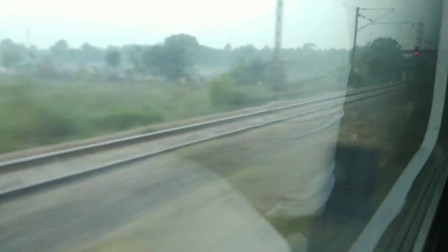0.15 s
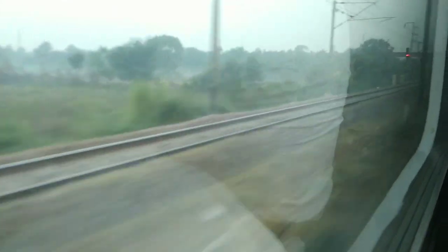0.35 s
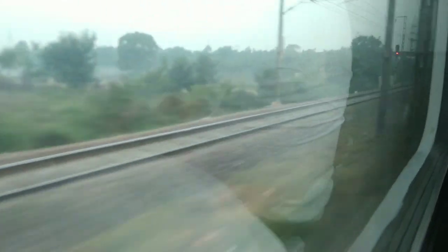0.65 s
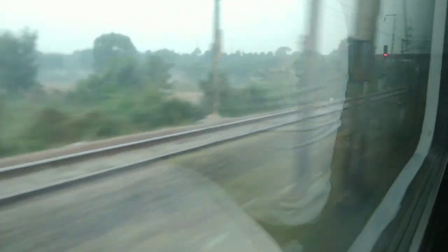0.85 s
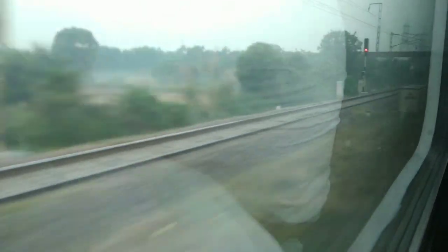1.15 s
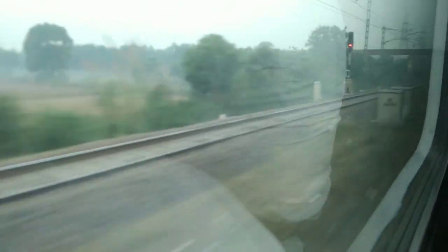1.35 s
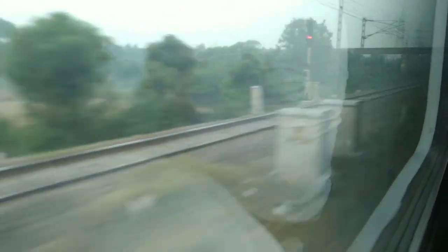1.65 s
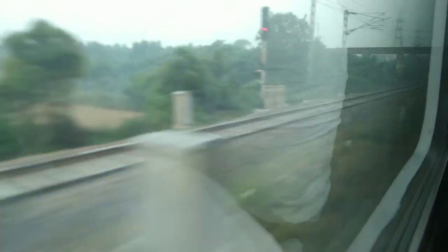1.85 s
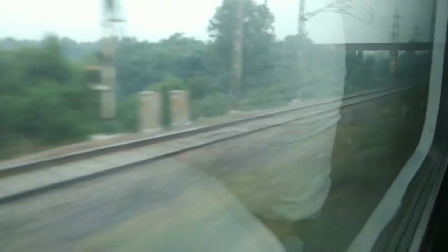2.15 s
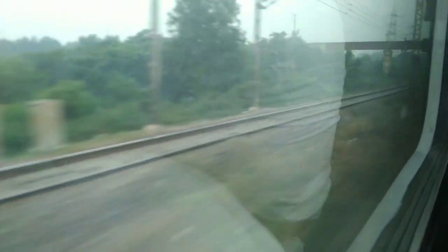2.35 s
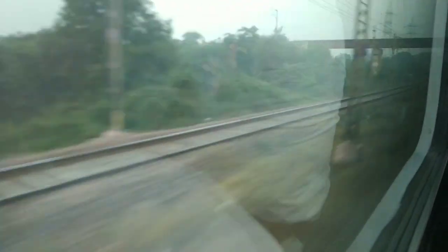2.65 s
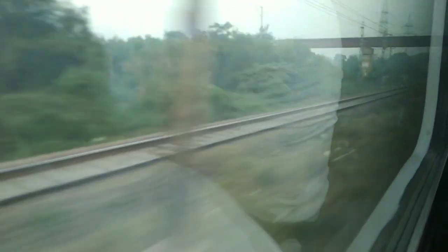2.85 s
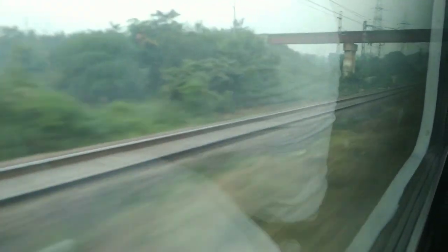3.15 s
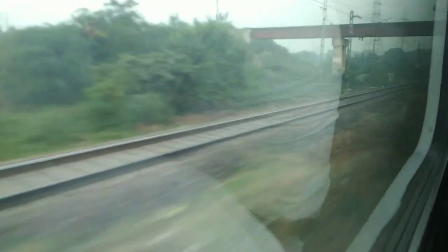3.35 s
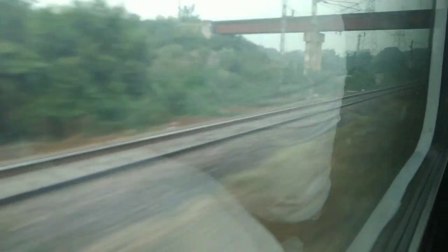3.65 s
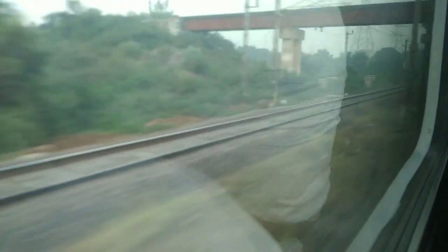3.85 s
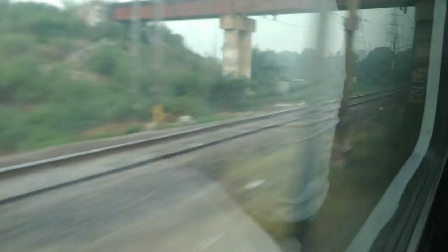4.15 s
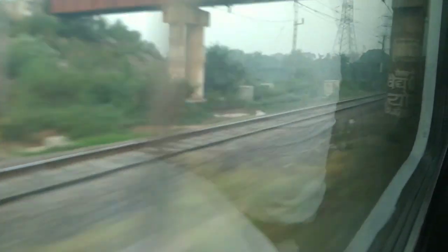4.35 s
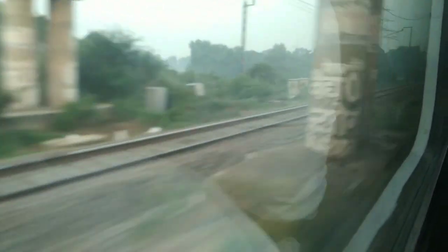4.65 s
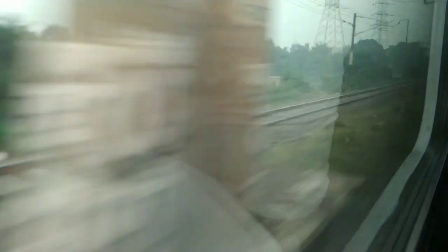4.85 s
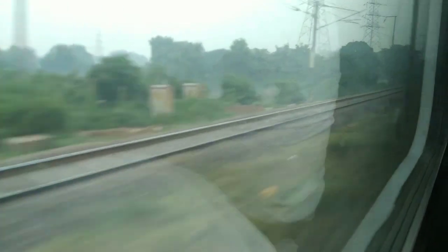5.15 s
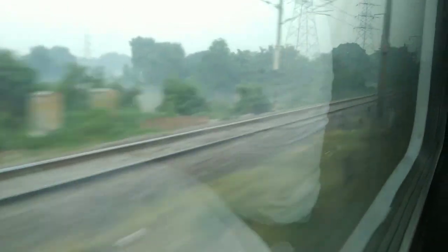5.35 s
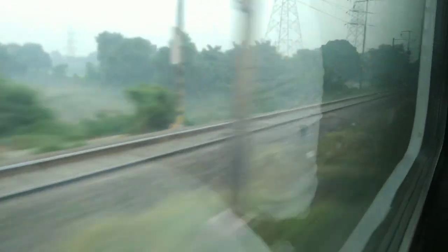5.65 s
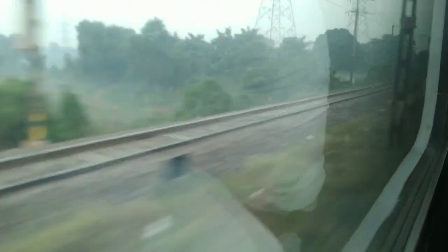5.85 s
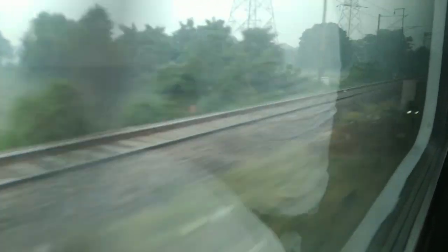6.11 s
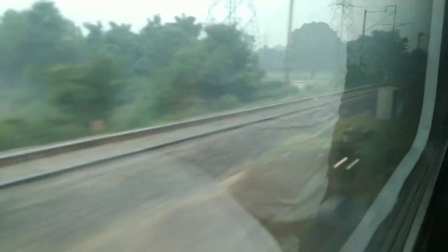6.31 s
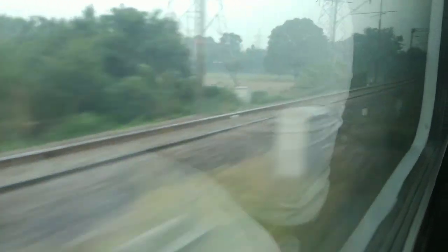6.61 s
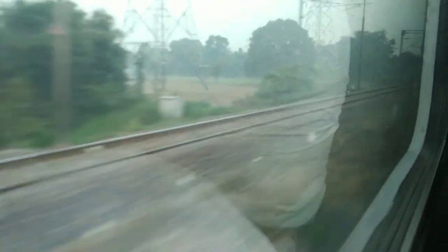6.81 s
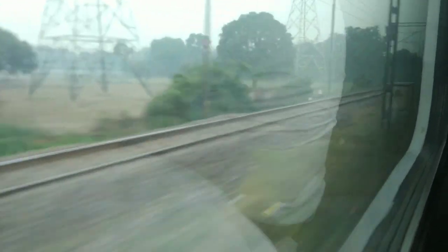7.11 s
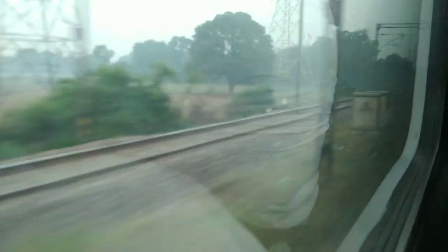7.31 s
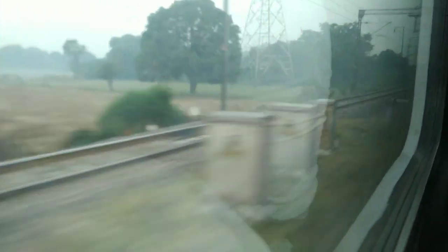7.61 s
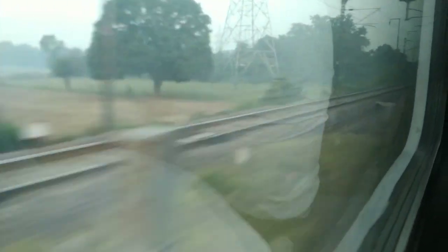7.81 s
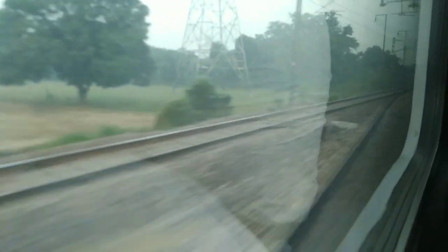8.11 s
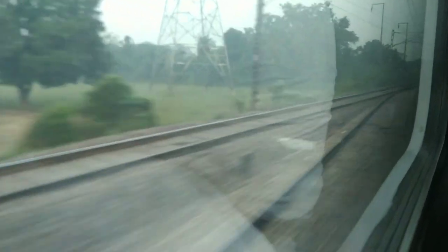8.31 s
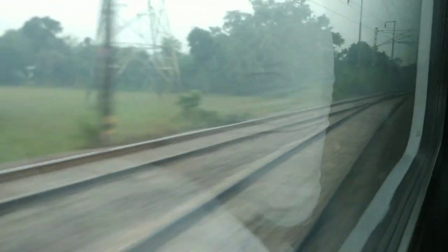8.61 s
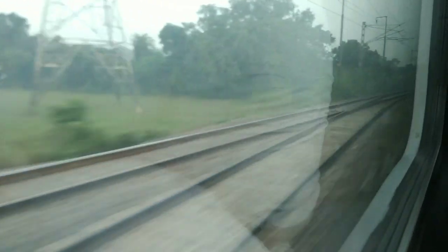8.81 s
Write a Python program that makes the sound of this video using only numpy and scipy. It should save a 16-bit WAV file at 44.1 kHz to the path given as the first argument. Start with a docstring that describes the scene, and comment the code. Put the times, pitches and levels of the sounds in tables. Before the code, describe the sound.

Nine seconds inside a coach running fast, in one channel, close to loose fittings and without bright treble. A deep rumble of floor, bogie and rails runs throughout, swelling in short low booms, under faint wheel singing and thin window air hiss. The first second and a half is fairly even, with weak joint knocks. Around 1.5 s the body heaves and a panel buzzes roughly until 2.9 s, with gritty rattles, a clatter at 2.1 and tiny squeaks near 2.4-2.7. Jolts gather at 3.2-3.4; a sharp close click falls at 4.1, then clatter at 4.4. From 5.2 to 6.5 the buzz returns among stronger knocks, rattles and fainter clicks at 5.9 and 6.3. After clatter at 7.0 and 7.4, the heaviest shaking comes from 7.6 to 8.4, booming hardest near 8.15. It eases somewhat, but the rumble runs to the end.

```python
"""Inside a coach running fast for nine seconds, the microphone among loose fittings, air hissing along the window.
From the start noise rings floor, bogie, rails and wheels; short tones swell in the rumble, rail joints clatter.
About 1.5 s the body heaves once and a panel, tapped 66 times a second, buzzes until 2.9 s; narrow noises squeak.
Damped modes click close by near 4.1, 5.9 and 6.3 s; the buzz is back from 5.2 to 6.5 s, and bursts rattle throughout.
The heaviest shaking comes between 7.6 and 8.4 s, and the ride runs on to the end."""
import sys
import numpy as np
from scipy import signal
from scipy.fft import rfft, irfft
from scipy.io import wavfile
from scipy.ndimage import uniform_filter1d

SR = 44100
rng = np.random.default_rng(int(sys.argv[2]) if len(sys.argv) > 2 else 0)


def put_to_file(sound):
    """Save the sound as 16-bit audio at rate SR, in the file named by the first command-line argument."""
    columns = np.atleast_2d(sound).T  # one column per channel
    safe = np.clip(columns, -1, 1)
    whole_steps = np.round(safe * 32767)
    wavfile.write(sys.argv[1], SR, whole_steps.astype(np.int16))


N = 395567

# rolling noise: (t/s, rail level/dB, wheel ring level/dB)
RUSH = [(0.0, -40, -46), (1.2, -39, -50.5), (2.1, -37, -47.5), (2.27, -39, -51.5), (2.87, -38, -47.5),
        (3.15, -34.5, -48), (3.57, -41.5, -50.5), (4.45, -37.5, -48.5), (4.75, -38.5, -47.5),
        (5.3, -36, -48), (5.6, -35, -45), (5.9, -34, -45), (6.1, -33, -44), (6.47, -37, -49.5),
        (7.44, -38, -50), (7.62, -39, -48), (7.72, -34, -45), (7.82, -36.5, -42), (7.92, -39.5, -49.5),
        (8.05, -37.5, -44), (8.14, -33, -43.5), (8.3, -33, -43.5), (8.54, -37.5, -45.5),
        (8.97, -35.5, -47.5)]
# modes of the bogie, relative levels: (f/Hz, width/Hz, level/dB)
BOGIE = [(152, 29, -1.5), (173, 87, 1.5), (264, 58, -1.5), (317, 47, -3.5), (405, 96, -15)]


def gain_of(db):
    """Amplitude factor of a level in dB."""
    return 10 ** (np.asarray(db) / 20)


def evened(x):
    """Scales a signal to an RMS of one."""
    return x / np.sqrt(np.mean(x ** 2) + 1e-20)


def add(mix, s, sound):
    """Lays a sound into the mix from the given second on."""
    part = mix[max(round(s * SR), 0):][:len(sound)]
    part += sound[:len(part)]


def along(rows):
    """The columns of a curve table, one value per sample."""
    s, *columns = np.transpose(rows)
    return [np.interp(np.arange(N) / SR, s, c) for c in columns]


def shape(points, size, tilt_db=0., pivot_hz=1000):
    """Gain per bin of a spectrum, tilted by dB per octave about a pivot."""
    f, db = np.transpose(points)
    hz = np.fft.rfftfreq(size, 1 / SR) + 1
    curve_db = np.interp(np.log(hz), np.log(f + 1), db)
    return gain_of(curve_db + tilt_db * np.log2(hz / pivot_hz))


def modal(modes, size=N, order=2):
    """Gain per bin of a set of resonances, their powers summed."""
    hz = np.fft.rfftfreq(size, 1 / SR)
    return np.sqrt(sum(gain_of(2 * db) / (1 + (2 * (hz - f) / w) ** 2) ** order for f, w, db in modes))


def noise(gain, size):
    """Random noise with the given spectrum and an RMS of one."""
    a, b = rng.standard_normal((2, len(gain)))
    return evened(irfft((a + 1j * b) * gain, size))


def ringing(modes, t, turns):
    """Damped sines of struck modes: a wider resonance dies sooner."""
    return sum(gain_of(db) * np.exp(-np.pi * width * t) * np.sin(2 * np.pi * (hz * t + turn))
               for (hz, width, db), turn in zip(modes, turns))


def flutter(seconds, depth_db):
    """Random unevenness of level, changing over about the given time."""
    span = max(int(seconds * SR), 2)
    drift = uniform_filter1d(uniform_filter1d(rng.standard_normal(N), span), span)
    return gain_of(depth_db * evened(drift))


def steadied(x, seconds, share):
    """Takes out part of the slow chance beating of narrow noise."""
    span = int(seconds * SR)
    power = abs(uniform_filter1d(uniform_filter1d(x ** 2, span), span)) + 1e-3
    return evened(x / power ** (np.clip(share, 0, 1) / 2))


def patchy(x, depth_db):
    """Uneven noise: narrow patches of the spectrum rise and sink at random."""
    z = signal.stft(x, nperseg=1024, noverlap=768)[2]
    patches = uniform_filter1d(rng.standard_normal(z.shape), size=3, axis=0)
    patches = evened(uniform_filter1d(patches, size=10, axis=1))
    return evened(signal.istft(z * gain_of(depth_db * patches), nperseg=1024, noverlap=768)[1][:N])


def heaving():
    """Very low noise, felt more than heard, with one slow swing of the body."""
    # spectrum, relative: (f/Hz, level/dB)
    heave_curve = [(1, -2.5), (4, 21.5), (12, 15), (20, 0.5), (30, -61)]
    # the one swing: (t/s, level/dB, f/Hz, length/s)
    s, db, hz, length = (1.525, -12, 9.5, .17)
    heave = gain_of(-27.5) * noise(shape(heave_curve, N), N)
    t = np.arange(round(length * SR)) / SR
    add(heave, s, gain_of(db) * np.sin(np.pi * t / length) * np.sin(2 * np.pi * hz * t))
    return heave


def rolling():
    """Rail roughness drives the slow sway, the floor and bogie modes, and the rail."""
    # how hard the track shakes the coach: (t/s, floor boom level/dB, bogie level/dB, floor bending level/dB)
    ride = [(0.0, -31, -35, -25), (0.82, -27, -35, -32.5), (1.2, -30, -37.5, -31.5),
            (1.9, -27, -33.5, -29.5), (2.95, -29.5, -35, -30), (3.05, -23, -26.5, -32),
            (3.25, -29, -29.5, -21), (3.36, -29.5, -33, -28), (3.55, -26.5, -34, -26.5),
            (4.15, -26.5, -34.5, -27), (4.22, -27, -28, -28), (4.65, -32, -34.5, -26.5),
            (5.3, -24.5, -33, -27.5), (5.84, -22, -28.5, -23.5), (6.54, -26, -30.5, -29.5),
            (6.75, -30.5, -26.5, -22), (6.93, -24.5, -32, -26), (7.05, -26, -26.5, -27.5),
            (7.3, -32, -36.5, -25.5), (7.42, -26, -31.5, -30), (7.55, -25, -27.5, -30),
            (7.64, -20.5, -31, -18), (7.74, -18, -18, -14), (7.86, -20.5, -29, -32),
            (7.95, -30, -29.5, -21.5), (8.05, -33, -28.5, -24), (8.09, -20, -27.5, -29),
            (8.15, -14.5, -13, -16), (8.27, -15.5, -24, -18.5), (8.36, -16, -25, -29),
            (8.55, -24.5, -33, -26.5), (8.97, -26, -32, -23)]
    # spectrum of the sway, relative: (f/Hz, level/dB)
    sway_curve = [(8, -19.5), (18, -5.5), (27, 1.5), (36, -5.5), (45, -17.5), (60, -24), (100, -64.5)]
    # two long bending modes, then three panel modes that boom: (f/Hz, width/Hz, relative level/dB)
    floor_modes = [(59, 14, 1), (65.3, 17, -1), (82.4, 15, -2.5), (102.4, 20, -1), (119, 20, -10.5)]
    # spectrum of the rail, relative: (f/Hz, level/dB)
    rail_curve = [(220, -32.5), (380, -1.5), (418, -0.5), (476, 1.5), (512, -2), (615, 1), (738, -6.5),
                  (886, -8), (1200, -19), (1560, -38.5), (2640, -120)]
    boom_db, bogie_db, bend_db = along(ride)
    lumps = flutter(.06, depth_db=1.7)  # floor, bogie and rail feel the same uneven track

    calm_db, calm_boom_db, follows = -29, -28.5, 0.32  # sway rises by a share of the boom over its calm level
    sway_db = calm_db + follows * (boom_db - calm_boom_db)
    sway = gain_of(sway_db) * noise(shape(sway_curve, N), N) * flutter(0.14, depth_db=3.0)

    bend = gain_of(bend_db) * steadied(noise(modal(floor_modes[:2]), N), 0.11, share=0.89)
    boom = gain_of(boom_db) * steadied(noise(modal(floor_modes[2:]), N), 0.066, share=0.47)
    bogie = gain_of(bogie_db) * steadied(noise(modal(BOGIE), N), 0.062, share=0.45)
    rail = patchy(noise(shape(rail_curve, N), N), depth_db=1.7)
    rail *= gain_of(along(RUSH)[0]) * flutter(0.013, depth_db=0.5)
    return heaving() + sway + lumps * (bend + boom + bogie) + lumps ** .5 * rail


def rumble_swells():
    """Swells of the rumble: short tones of a few cycles that rise and die."""
    # low booming swells: (loudest at t/s, level/dB, f/Hz, length scale/s)
    low_swells = [(0.147, -20, 79, 0.02), (0.234, -12.5, 82, 0.03), (0.549, -18, 77, 0.02),
                  (0.974, -19, 74.6, 0.028), (1.221, -17, 77.5, 0.035), (1.735, -15.5, 70.5, 0.041),
                  (1.932, -11.5, 86, 0.014), (2.08, -15, 83, 0.028), (2.216, -29, 88, 0.0098),
                  (3.105, -24, 93, 0.032), (3.219, -12.5, 87, 0.038), (3.435, -14, 112, 0.036),
                  (4.294, -10, 85, 0.037), (4.423, -11, 96, 0.024), (4.72, -13, 79, 0.014),
                  (4.928, -10.5, 74.5, 0.02), (5.194, -11.5, 90.5, 0.022), (5.559, -11.5, 97.4, 0.054),
                  (5.792, -11.5, 81, 0.031), (5.85, -10, 83.5, 0.024), (5.931, -8.5, 95.6, 0.016),
                  (6.336, -5, 84, 0.017), (6.581, -14, 71, 0.033), (6.736, -16, 113, 0.055),
                  (6.888, -18, 103, 0.016), (7.007, -17, 129, 0.017), (7.097, -11.5, 77, 0.019),
                  (7.593, -7, 76.5, 0.017), (7.713, -13, 96, 0.018), (7.771, -13, 102, 0.024),
                  (7.859, -10, 89, 0.02), (8.079, -7, 116, 0.032), (8.148, -2.5, 107.6, 0.032),
                  (8.217, -9, 104, 0.036), (8.318, -6.5, 95, 0.025), (8.401, -10, 90.5, 0.022),
                  (8.651, -14, 85.4, 0.025), (8.715, -9.5, 69, 0.033), (8.81, -24, 82, 0.017),
                  (8.882, -11, 91, 0.02)]
    # higher, shorter swells, about 150 to 600 Hz: (loudest at t/s, level/dB, f/Hz, length scale/s)
    higher_swells = [(0.353, -20, 172, 0.018), (1.684, -24, 515, 0.0095), (2.017, -27, 457, 0.017),
                     (2.68, -24, 164, 0.033), (3.065, -27, 276, 0.022), (3.105, -30, 170.0, 0.02),
                     (3.211, -24.0, 280, 0.036), (3.416, -22.5, 279.0, 0.026), (4.206, -17, 178, 0.016),
                     (4.293, -24, 172, 0.017), (4.412, -28, 566, 0.014), (4.489, -30, 587, 0.025),
                     (5.346, -24.5, 288, 0.013), (5.555, -20.5, 270, 0.016), (5.557, -27, 474, 0.0091),
                     (5.716, -24, 520, 0.011), (5.992, -22, 590, 0.0094), (6.016, -27, 274, 0.025),
                     (6.317, -26, 282, 0.014), (6.645, -22, 557, 0.0087), (6.711, -22, 284, 0.011),
                     (6.733, -18, 168, 0.027), (7.004, -22.5, 157, 0.042), (7.424, -24.5, 307.0, 0.043),
                     (7.428, -27, 500, 0.01), (7.584, -19, 167, 0.036), (7.654, -14.5, 163, 0.019),
                     (7.705, -22, 304, 0.015), (7.72, -17, 181.0, 0.012), (7.737, -25, 486, 0.023),
                     (7.774, -17.5, 310, 0.022), (7.819, -17.5, 153, 0.04), (8.077, -17, 300, 0.022),
                     (8.113, -11, 169, 0.032), (8.133, -14.5, 269, 0.024), (8.134, -35, 559.0, 0.015),
                     (8.176, -8, 169, 0.02), (8.18, -24, 483, 0.013), (8.185, -16.5, 303, 0.017),
                     (8.231, -31, 524.0, 0.01), (8.246, -15, 270, 0.042), (8.278, -24, 607, 0.018),
                     (8.304, -17.5, 166, 0.049), (8.877, -29, 277, 0.057)]
    tones = low_swells + higher_swells
    out, t = np.zeros(N), np.arange(-3000, 5000) / SR
    for (s, db, hz, length), turn in zip(tones, rng.random(len(tones))):
        rise = np.exp(-(t / (0.34 * length)) ** 2)
        fall = 1 / np.cosh(t / (0.33 * length))
        swell = np.where(t < 0, rise, fall)
        add(out, s + t[0], gain_of(db) * swell * np.sin(2 * np.pi * (hz * t + turn)))
    return out


def jolts():
    """Each rail joint gives a clatter of shaped noise and knocks the bogie modes."""
    # (t/s, clatter level/dB, fading t60/s, brightness/dB per octave, knock level/dB before a common cut)
    joints = [(0.209, -49, 0.29, -3, -25), (0.515, -47, 0.206, -2, -20), (1.723, -38.5, 0.3, -14, -20),
              (1.896, -48, 0.19, 5, -5.5), (2.065, -24, 0.25, -7, -13), (3.2, -33.5, 0.45, 2, -6),
              (3.288, -38.5, 0.3, 3.5, -24), (3.409, -34.5, 0.1, 0, -6), (3.759, -42, 0.37, 2.5, -38),
              (3.839, -32, 0.21, 0.8, -35), (4.029, -32.5, 0.26, -0.5, -24), (4.199, -40, 0.43, 3, -26),
              (4.273, -37.5, 0.99, 1, -16), (4.396, -26, 0.25, -2, -10), (4.479, -28.5, 0.24, -4, -10),
              (4.909, -51, 0.26, -4, -26), (5.179, -28.5, 0.18, -4, -16), (5.54, -25.5, 0.58, -4, 0),
              (5.619, -38, 0.5, 2, -29), (5.707, -32.5, 0.27, 0.7, -34), (5.798, -37.5, 0.23, 2.5, -25),
              (5.985, -27, 0.76, -1.2, -21.5), (6.059, -27.5, 0.23, 0.5, -18),
              (6.26, -27.5, 0.66, -2.5, -23), (6.333, -42.5, 0.19, 6, -1), (6.612, -29, 0.95, -1.5, -30),
              (7.01, -32.5, 0.7, -0.6, -31), (7.403, -27, 0.99, -2.5, -24), (7.625, -30.5, 0.91, -2.5, -26),
              (7.705, -24.5, 0.38, -5.5, -14), (8.065, -24, 0.78, -3, -26), (8.129, -29, 0.59, 0, -15),
              (8.194, -22.5, 0.16, -2.5, -19), (8.267, -28.5, 0.22, -5.5, -30),
              (8.409, -24.5, 0.34, -4.5, -33), (8.655, -32.5, 0.36, -3.5, -15)]
    # spectrum of the clatter, relative: (f/Hz, level/dB)
    clatter_curve = [(150, -26.5), (250, -2), (364, -4), (632, -17), (731, -18.5), (935, -21), (1420, -32),
                     (1960, -25.5), (3210, -37), (6340, -48.5), (8000, -63.5), (10400, -87.5),
                     (17600, -120)]
    out, t = np.zeros(N), np.arange(16384) / SR
    low_cut = shape([(200, -28.5), (600, -8.0)], len(t))
    knock_modes = [(hz, width, db - 7) for hz, width, db in BOGIE]  # the common cut, in dB
    for s, db, t60, tilt_db, knock_db in joints:
        clatter = noise(shape(clatter_curve, len(t), tilt_db) * low_cut, len(t))
        rise = .006 + .05 * t60  # s: a clatter that fades slowly also swells slowly
        swell = np.sin(np.pi / 2 * np.minimum(t / rise, 1)) ** 2
        fade = gain_of(db - 60 * np.maximum(t - rise / 2, 0) / t60)
        add(out, s - rise / 2, swell * fade * clatter)
        knock = ringing(knock_modes, t, rng.random(len(knock_modes)))
        add(out, s, gain_of(knock_db) * np.minimum(t / 0.017, 1) * knock)
    return out


def buzz():
    """Evenly timed taps of random strength, with noise between them, ring the modes of a panel."""
    # two spells of buzzing: (t/s, level/dB)
    spells = [(1.45, -62), (1.54, -36.5), (1.75, -37), (1.83, -42.5), (1.92, -34.5), (2.05, -37),
              (2.36, -36.5), (2.64, -38.5), (2.76, -51), (2.9, -66.5), (5.2, -69.5), (5.45, -48),
              (5.65, -35.5), (5.85, -38), (6.0, -36), (6.2, -39), (6.35, -42.5), (6.5, -66)]
    # modes of the panel: (f/Hz, width/Hz, relative level/dB)
    panel_modes = [(470, 40, -1), (519, 38, 0.5), (560, 40, 0), (596.7, 36, -1), (624.6, 30, -7)]
    taps_per_s = 66
    swell = gain_of(along(spells)[0]) * flutter(0.061, depth_db=3.0)
    tap_count = np.floor(np.cumsum(np.full(N, taps_per_s)) / SR)
    taps = np.diff(tap_count, prepend=0) * gain_of(2.5 * rng.standard_normal(N))
    drive = evened(taps) + 1.4 * rng.standard_normal(N)
    t = np.arange(2000) / SR
    ring = ringing(panel_modes, t, np.zeros(len(panel_modes)))
    soft_ring = ring * (1 - np.exp(-t / 0.0043))  # soft taps: the ring builds up gradually
    panel = evened(signal.oaconvolve(drive, soft_ring)[:N])
    return swell * steadied(panel, 0.05, share=0.6)


def rattles():
    """Loose fittings: a burst of gritty noise that swells and dies, like dense tiny impacts."""
    # (t/s, level/dB, rise/s before a slight stretch, fading t60/s, brightness/dB per octave)
    bursts = [(0.0, -53.5, 0.013, 1.1, 11), (.92, -57, 0.042, 0.34, 14), (1.19, -58, 0.0046, 0.084, 10),
              (1.564, -43.5, 0.023, 0.31, 4.5), (1.586, -38, 0.026, 0.23, 2.5),
              (1.929, -54.5, 0.078, 0.69, 5), (2.035, -49.5, 0.0093, 0.31, 20),
              (2.068, -37, 0.011, 0.25, 2), (2.31, -53, 0.022, 0.83, 15), (2.382, -37, 0.013, 0.19, 7),
              (2.661, -40, 0.013, 0.22, 0.5), (3.188, -53, .02, 0.3, 1), (3.29, -56, 0.035, .5, 4),
              (3.412, -40.5, 0.014, 0.13, 5.5), (3.47, -51, .03, .8, -1), (3.75, -61, .025, .25, -3),
              (5.628, -55, .01, .15, -3), (5.715, -45, 0.018, 0.23, -5), (5.859, -41, 0.0036, 0.14, -1.5),
              (5.985, -48, .025, 0.3, -4), (6.06, -52, 0.015, .5, -4), (6.78, -55, 0.037, .5, -4),
              (6.99, -47, 0.065, .5, -5), (7.1, -55, .02, .5, 0), (7.399, -52, .008, 0.25, -5),
              (7.69, -50.5, .04, .6, 2), (8.071, -48, .06, 0.96, -5.5), (8.1, -57, .08, 1.44, 0.5),
              (8.64, -58, 0.026, 0.205, 16), (8.89, -45, .004, 0.25, 8)]
    # spectrum of the fittings, relative: (f/Hz, level/dB)
    fitting_curve = [(710, -34.5), (1200, -6), (1580, -1), (1730, -5.5), (2080, -8), (3130, -9),
                     (4120, -11.5), (6690, -19), (7370, -19), (8250, -32.5), (10700, -57.5), (18200, -120)]
    out, t = np.zeros(N), np.arange(22050) / SR
    for s, db, rise, t60, tilt_db in bursts:
        unevenness = uniform_filter1d(rng.standard_normal(len(t)), size=130)
        grit = evened(gain_of(1.3 * evened(unevenness)))
        swell = np.sin(np.pi / 2 * np.minimum(t / (1.1 * rise), 1)) ** 2
        fade = gain_of(db - 60 * np.maximum(t - rise, 0) / t60)
        rattle = noise(shape(fitting_curve, len(t), tilt_db, pivot_hz=4000), len(t))
        add(out, s, swell * fade * grit * rattle)
    return out


def squeaks():
    """Short rings and squeaks: narrow noise under half a sine of level."""
    # (t/s, level/dB, f/Hz, width/Hz, length/s)
    squeak_rows = [(1.967, -64, 6190, 400, 0.089), (2.394, -53, 7450, 300, 0.044),
                   (2.5, -64, 5200, 400, 0.015), (2.518, -56, 5250, 500, 0.019),
                   (2.547, -64, 5250, 400, 0.02), (2.57, -62, 5100, 400, 0.017),
                   (2.595, -61, 5100, 400, 0.018), (2.62, -65, 5100, 300, 0.016),
                   (2.728, -67, 5100, 300, 0.016), (2.383, -49, 1590, 80, 0.04),
                   (2.388, -54.5, 3310, 120, 0.064), (3.407, -38, 780, 250, 0.016),
                   (5.375, -55, 5150, 160, 0.027), (5.458, -59, 5270, 252, 0.019),
                   (6.22, -65, 7400, 400, 0.19), (6.465, -65, 6100, 250, 0.04),
                   (6.522, -59, 6100, 250, 0.025), (8.067, -35, 1010, 300, 0.03)]
    out = np.zeros(N)
    for s, db, hz, width, length in squeak_rows:
        t = np.arange(round(length * SR)) / SR
        tone = noise(modal([(hz, width, 0)], size=16384), 16384)[:len(t)]
        swell = 1.47 * np.sin(np.pi * t / length)  # the factor makes up for the half sine
        add(out, s, gain_of(db) * swell * tone)
    return out


def clicks():
    """Sharp clicks close to the microphone: two heavily damped modes, low and high."""
    # (t/s, low mode level/dB, high mode level/dB), both before damping
    click_rows = [(4.0915, -2, -18), (5.8625, -19, -25), (6.338, -25, -31)]
    # low and high mode: (f/Hz, width/Hz, rise/s, lag/s)
    click_modes = [(790, 1100, .0004, 0), (6300, 3000, .0001, .00028)]
    out, t = np.zeros(N), np.arange(400) / SR
    for s, *levels_db in click_rows:
        for db, (hz, width, rise, lag) in zip(levels_db, click_modes):
            ring = ringing([(hz, width, db)], t, [1 / 8])
            add(out, s + lag, np.minimum(t / rise, 1) * ring)
    return out


def whining():
    """Wheel modes that sing: narrow noises, the first of which comes and goes."""
    # (f/Hz, width/Hz, level/dB)
    whine_modes = [(1822, 24, -61), (2340, 30, -63), (3440, 11, -72.5), (890, 200, -52.5)]
    # the first tone comes and goes: (t/s, level change/dB)
    singing = [(0, -3), (.45, 5.5), (1.0, -1.5), (1.6, -6), (2.0, 1), (3.2, 2), (3.45, -6), (3.7, 6.5),
               (4.1, 4.5), (4.4, 3.5), (5.5, 3.5), (6.2, -12), (6.7, 9), (7.0, -10), (8.97, -6)]
    first, *others = [gain_of(db) * noise(modal([(hz, width, 0)]), N) * flutter(0.07, depth_db=2.5)
                      for hz, width, db in whine_modes]
    return gain_of(along(singing)[0]) * first + sum(others)


def rushing():
    """Wheels ring broadly with a few singing modes; air hisses along the window."""
    # spectrum of the wheels, relative: (f/Hz, level/dB)
    wheel_curve = [(650, -34), (1100, -5.5), (1340, -5.5), (1880, -3.5), (1920, -2), (2420, -7.5),
                   (2510, -8), (3400, -17.5), (4420, -48.5), (7480, -120)]
    # spectrum of the air, relative: (f/Hz, level/dB)
    air_curve = [(1880, -13), (3200, -9), (3480, -5), (3650, -5), (5890, -12.5), (7010, -13), (7530, -19),
                 (8250, -42), (10700, -55), (18200, -120)]
    # the air along the window: (t/s, level/dB)
    hiss = [(0.0, -52), (0.17, -58), (0.75, -60.5), (1.47, -61.5), (2.62, -56.5), (3.02, -57),
            (3.37, -56.5), (3.62, -61), (4.12, -58.5), (4.34, -55), (4.94, -58.5), (5.17, -56.5),
            (5.74, -53.5), (6.24, -52.5), (6.42, -56.5), (7.44, -59.5), (7.64, -57), (7.89, -57),
            (8.12, -60), (8.25, -52), (8.32, -50.5), (8.57, -55.5), (8.82, -55), (8.97, -55)]
    bumps = flutter(0.025, depth_db=0.5)  # wheels and air feel the same small bumps
    wheel = gain_of(along(RUSH)[1]) * patchy(noise(shape(wheel_curve, N), N), depth_db=2.5)
    air = gain_of(along(hiss)[0]) * patchy(noise(shape(air_curve, N), N), depth_db=2.0)
    return bumps * (wheel + air) + whining()


def scene():
    """The coach as it reaches the microphone, in one channel."""
    coach = rolling() + rumble_swells() + jolts() + buzz()
    details = rattles() + squeaks() + clicks()
    return (coach + details + rushing())[None]


def record(dry):
    """The microphone's top end, a soft overload, then the band limit of the recorder."""
    # the microphone fades at the top: (f/Hz, level/dB)
    mic_curve = [(7300, -0.5), (7800, -2.5), (8300, -23.5)]
    full_scale, edge_hz = 1.1, 8350  # the input stage rounds off the loudest peaks
    picked_up = irfft(rfft(dry) * shape(mic_curve, N), N)
    heard = full_scale * np.tanh(picked_up / full_scale)
    band_limit = signal.firwin(1023, edge_hz, window=("kaiser", 9), fs=SR)
    return signal.oaconvolve(heard, band_limit[None], "same")


dry = scene()
out = record(dry)
put_to_file(out)
```